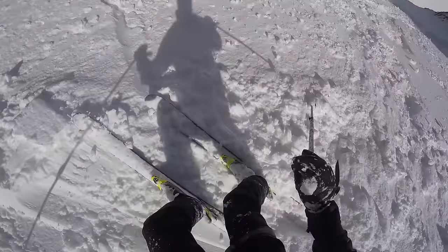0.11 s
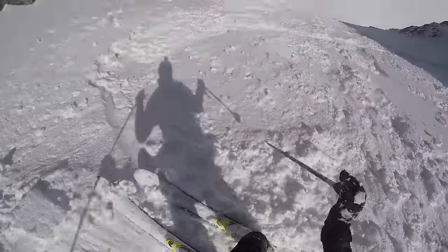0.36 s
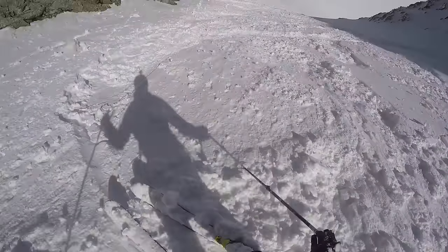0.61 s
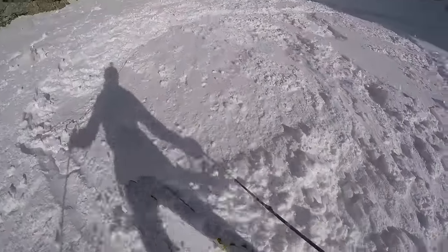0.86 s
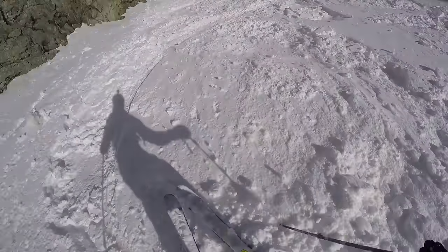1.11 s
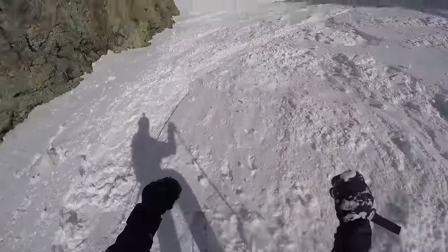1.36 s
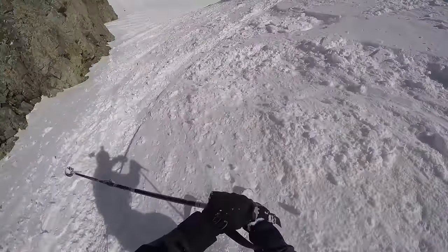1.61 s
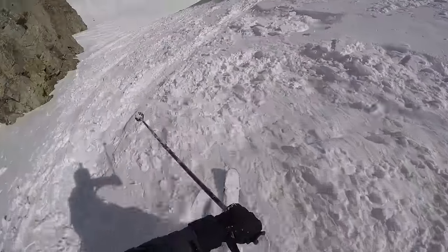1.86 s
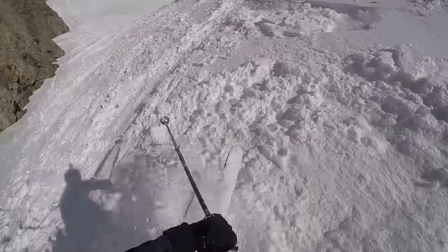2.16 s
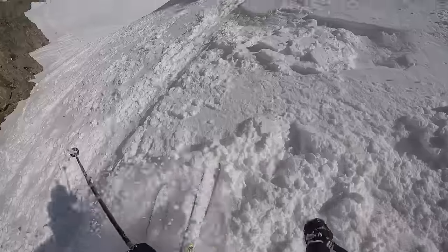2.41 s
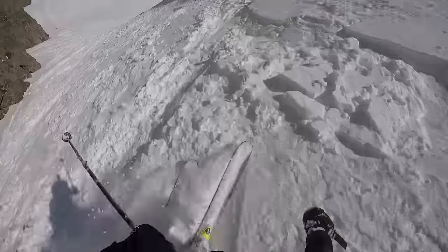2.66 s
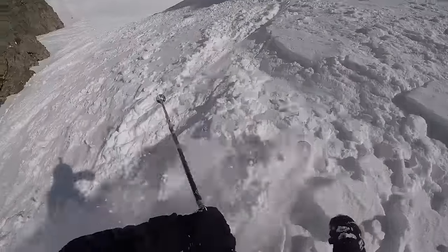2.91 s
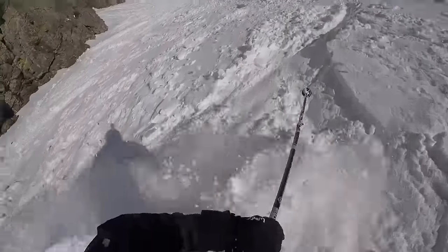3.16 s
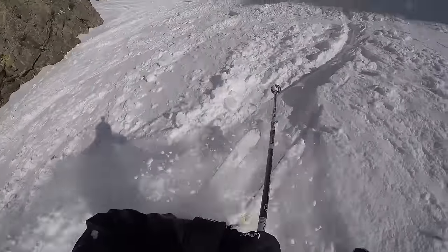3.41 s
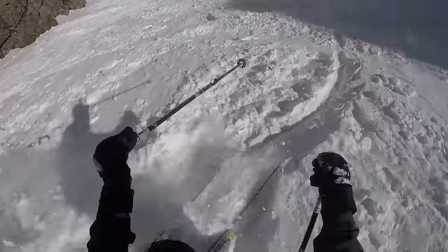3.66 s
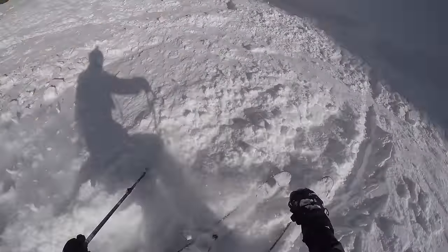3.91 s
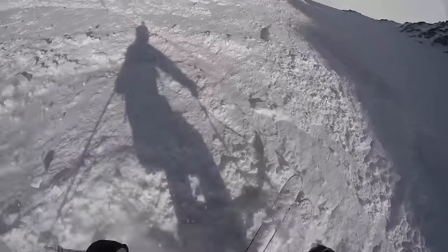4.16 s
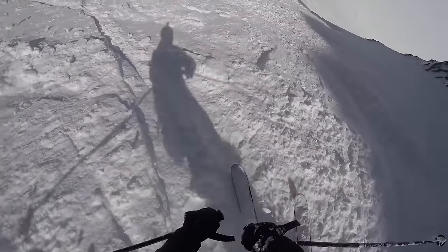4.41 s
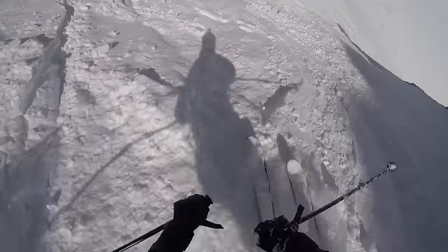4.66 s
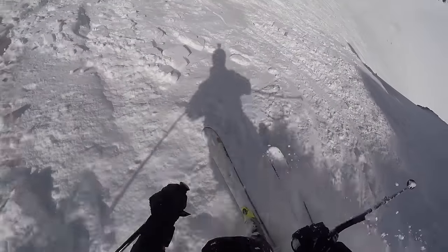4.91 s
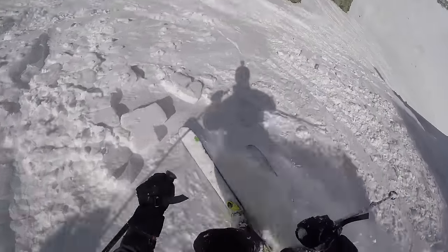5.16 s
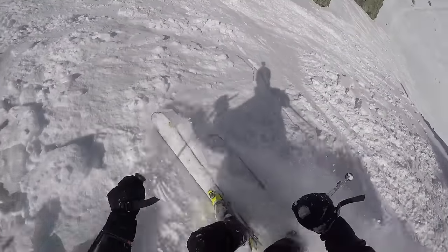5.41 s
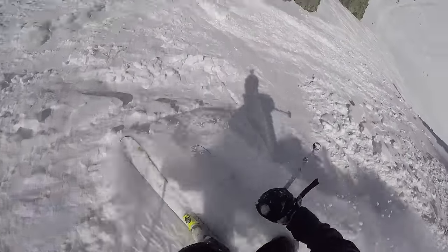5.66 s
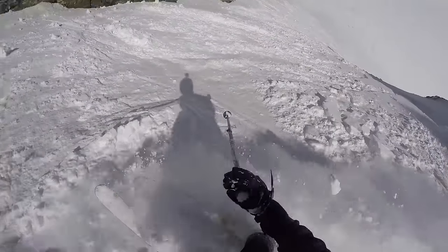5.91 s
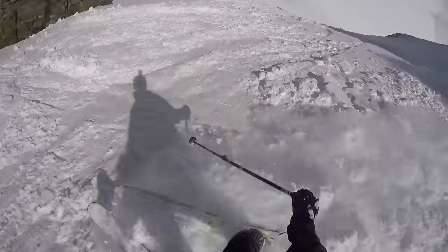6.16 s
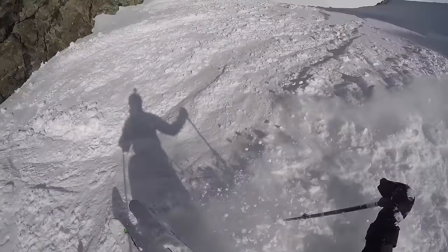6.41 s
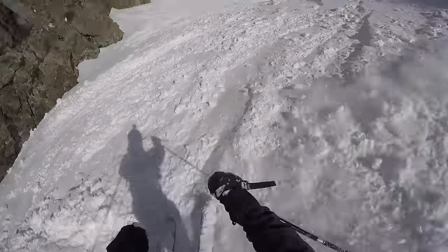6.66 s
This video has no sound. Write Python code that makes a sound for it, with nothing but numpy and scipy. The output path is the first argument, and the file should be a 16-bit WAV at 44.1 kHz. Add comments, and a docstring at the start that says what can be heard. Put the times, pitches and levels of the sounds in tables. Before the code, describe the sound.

Muffled plasticky knocks and gritty edge scrapes from a steep ski descent, building to one very loud crack and bursts of hissing snow.

```python
"""Skiing hard snow, heard inside a helmet camera case

A skier turns down hard, chopped snow; the microphone sits in a closed camera case on the helmet.
Lumps knock through body and mount: case modes tick, then the mount thumps with falling pitch.
Ski edges scrape in gusts of grit through the case modes and squeak in narrow bands; thrown snow
hisses as coloured clicks and noise. Low noise rumbles as wind over faint electronic hiss and whine."""
import sys
import numpy as np
from scipy import signal
from scipy.fft import rfft, irfft
from scipy.io import wavfile
from scipy.ndimage import uniform_filter1d

SR = 44100
rng = np.random.default_rng(int(sys.argv[2]) if len(sys.argv) > 2 else 0)


def store_pcm(level_fs):
    """Save levels as 16-bit WAV."""
    pcm = np.round(np.clip(level_fs, -1, 1) * 32767).astype(np.int16)
    wavfile.write(sys.argv[1], SR, np.atleast_2d(pcm).T)


def invert_db(level):
    """Linear amplitude ratio for a level in decibels (20 dB per decade), elementwise."""
    return 10 ** (np.asarray(level, dtype=float) / 20)


N = 299156
T = np.arange(N) / SR

# case modes: f/Hz, relative level/dB, reference t60/s (each source scales it)
CASE = [(611, -4, 0.02), (1116, 6, 0.012), (1360, -2.5, 0.014), (1642, 0, 0.018), (1880, 4, 0.015),
        (2307, -2, 0.023), (2590, -6, 0.027), (2938, -5, 0.021), (3400, -19.5, 0.01), (3755, -14.5, 0.0089),
        (4450, -14, 0.0057), (5500, -16, 0.0063), (6577, -20, 0.01), (9930, -40, 0.01), (13700, -48, .006)]


def unit(x):
    """Scale to rms 1."""
    return x / np.sqrt(np.mean(x ** 2))


def colour(x, points):
    """Shape x by a (f/Hz, relative density/dB) spectrum, scaled to rms 1."""
    hz, db = np.transpose(points)
    f = np.fft.rfftfreq(N, 1 / SR) + 1
    gain_db = np.interp(np.log(f), np.log(hz), db, left=-70, right=-70)
    return unit(irfft(rfft(x) * invert_db(gain_db), N))


def walk(rate_hz):
    """Random levels held 1 / rate_hz and slewed twice, rms 1."""
    hold = int(SR / rate_hz)
    steps = np.repeat(rng.standard_normal(N // hold + 1), hold)
    slewed = uniform_filter1d(uniform_filter1d(steps, hold), hold)
    return unit(slewed[:N])


def grit(per_s, spread_db, bed):
    """Snow crystals breaking: random clicks of very uneven size over a bed of noise."""
    hit = rng.random(N) < per_s / SR
    size_db = spread_db * rng.exponential(size=N).clip(0, 4)
    clicks = hit * rng.standard_normal(N) * invert_db(size_db)
    return unit(clicks) + bed * rng.standard_normal(N)


def ring(x, hz, t60_s):
    """One damped resonance driven by x (complex one-pole)."""
    pole = np.exp(2j * np.pi * hz / SR - np.log(1000) / (t60_s * SR))
    return signal.lfilter([1], [1, -pole], x).imag


def add(out, start_s, sound):
    """Mix a short sound in at start_s."""
    i = int(start_s * SR)
    out[i:i + len(sound)] += sound[:N - i]


def swell(start_s, top_s, end_s, db, edge_db, fade_s):
    """Power of one event: rises to db at top_s, sinks again, fades out at both ends."""
    nearness = np.interp(T, [start_s, top_s, end_s], [1, 0, 1])
    slope_db = edge_db * nearness ** 1.12  # exponent over 1 flattens the top
    on = uniform_filter1d(1. * ((T >= start_s) & (T < end_s)), int(fade_s * SR))
    return (on * invert_db(db + slope_db)) ** 2


def thump(hz, start_hz, glide_s, t60_s, rise_s):
    """Bending waves in the mount: the high part comes first, the pitch sinks to hz; peak 1."""
    t = T[:SR // 6]
    turns = hz * t + (start_hz - hz) * glide_s * (1 - np.exp(-t / glide_s))
    envelope = (1 - np.exp(-t / rise_s)) ** 2 * invert_db(-60 * t / t60_s)
    wave = np.sin(2 * np.pi * turns) * envelope
    return wave / np.abs(wave).max()


def knocks():
    """Each blow rings the case modes near its own centre, then the mount."""
    # blows: t/s, tick/dB, thump re tick/dB, treble re tick/dB, tick centre f/Hz
    blows = [(0.1839, -36.5, 1, -27, 706), (0.419, -44, -8, -23, 1220), (0.46, -28, -41, -9.5, 1260),
             (0.474, -36.5, -1, -26, 960), (0.5954, -29.5, -3, -34, 850), (0.6626, -32, -1, -19, 1470),
             (0.8421, -31, -39, -29, 1800), (0.8911, -30.5, -44, -38, 1580), (1.2235, -22, -27, -17, 2200),
             (1.4396, -49, 6.5, -10, 1560), (1.562, -39, -30, 2.5, 2800), (1.6565, -51, 14, -15, 1480),
             (1.8605, -16.5, -11, -27, 1480), (1.896, -36, -20, -18, 1600), (1.9219, -29.5, -30, -26, 1700),
             (1.949, -31.5, -25, -30, 1730), (2.0315, -18, -14, -22, 1480), (2.162, -14, -43, -25, 1460),
             (2.1663, -18.5, 2, -39, 1420), (2.3487, -12, -13, -28, 1390), (2.4852, -28.5, -4, -28, 910),
             (2.6982, -21, -6, -45, 1040), (2.7368, -29.5, -6, -10, 1010), (2.79, -24, -6, -25, 870),
             (2.9797, -29.5, -1, -31, 1070), (3.0201, -25.5, -4, -41, 1090), (3.1964, -17, -8.5, -17, 1090),
             (3.2928, -45, -8, -25, 700), (3.4682, -37.5, 3, -26, 880), (3.5428, -50.5, 12.5, -14, 1400),
             (3.7036, -30, -13, -33, 1370), (3.7647, -34.5, -22, -25, 1770), (3.798, -36.5, 6.5, -31, 710),
             (3.8713, -24, -3.5, -43, 960), (3.9754, -20.5, -5.5, -20, 1210), (4.0369, -25, -28, -14, 2450),
             (4.0888, -31, -45, -18, 2240), (4.3181, -29.5, -1.5, -23, 900), (4.5217, -35.5, -3, -30, 895),
             (4.536, -41, -30, -14, 1900), (4.61, -34, -10, -11, 990), (4.6505, -20.5, 2, -39, 1132),
             (4.6967, -23.5, 0, -34, 980), (4.7171, -32.5, 3, 1.5, 1840), (4.7239, -15.5, 0.5, -25, 1100),
             (4.8535, -17, -13, -45, 1370), (5.0305, -44.5, 11, -20, 660), (5.065, -48, 12, -20, 800),
             (5.081, -43, -30, -20, 1470), (5.2181, -18.5, -19.5, -33, 1720), (5.2383, -25, -12, -20, 1230),
             (5.2838, -16, -7, -31, 1200), (5.2901, -10.5, 0.5, -38, 1230), (5.3125, 2, -25.5, -8, 2280),
             (5.354, -20.5, -12, -16, 1000), (5.4123, -21.5, 1, -21, 1180), (5.5, -34, -12, -30, 1000),
             (5.5124, -21.5, 2.5, -24, 1170), (5.537, -33, -30, -25, 1300), (5.5789, -31, -3, -22.5, 1570),
             (5.6158, -35.5, 8, -17, 2140), (5.66, -39, -25, -25, 1200), (5.7084, -28, -7, -20, 1101),
             (6.316, -28.5, -43, -14, 1695), (6.419, -32, -5.5, -31, 1360), (6.5194, -34, -29, -28, 1840),
             (6.6219, -36, -34, -13, 1730), (6.6943, -34.5, 5, -26, 949.8),
             (6.7203, -15.5, -4.5, -19, 983.2)]
    # blows that tip the mount downwards first, a drier swing: t/s
    tip_down_s = np.array([0.1834, 0.5954, 0.6625, 1.8604, 2.3489, 2.6982, 2.9797, 3.0206, 3.1966, 3.7034,
                           3.798, 3.8714, 3.9759])
    light_tick_db = 1.4  # lowest mode, per dB of thump below -20 dB
    bright_tilt = 0.27  # dB per octave of top, per dB of treble
    snap_db, snap_per_treble, snap_t60_s = -15.5, 1.9, 0.0044  # wide-band crack of the contact

    out, t, snap_t = np.zeros(N), T[:SR // 20, None], T[:SR // 100]
    hz, mode_db, t60_s = np.transpose(CASE)
    chance = rng.standard_normal((len(blows), 2, len(CASE)))
    shell = 0.47 * thump(208.5, 378.0, 0.0017, 0.075, 0.00043)
    early = thump(584.0, 649.0, 0.0033, 0.025, 0.0004)  # helmet shell, ahead of the mount
    nod_up = thump(72.5, 125.6, 0.0075, 0.034, 0.0021) + shell
    nod_down = -thump(70.0, 271.0, 0.0048, 0.023, 0.0056) - 0.78 * shell

    for (s, tick_db, thump_db, treble_db, centre_hz), (gain, phase) in zip(blows, chance):
        near_db = mode_db - 6 * np.log2(hz / centre_hz) ** 2 + 2 * gain
        near_db += (hz < 800) * light_tick_db * min(thump_db + 20, 0)
        tilt_db = bright_tilt * (treble_db + 20) * np.log2(hz / 3650)  # hard contacts reach higher
        top_db = mode_db + 3 * gain + tilt_db

        # a quick first fall, then a weak tail
        decay = invert_db(-60 * t / (0.19 * t60_s)) + 0.035 * invert_db(-60 * t / (1.255 * t60_s))
        start_rad = 1 + 0.6 * phase
        modes = decay * np.sin(2 * np.pi * hz * t + start_rad)
        modes *= (1 - np.exp(-t / 0.00049)) ** 3  # the contact takes a moment to build
        body = modes @ (invert_db(near_db) * (hz < 3300))
        top = modes @ (invert_db(top_db) * (hz > 3300))
        body = signal.lfilter(*signal.butter(2, 0.31 * centre_hz, "high", fs=SR), body)
        tick = body / np.abs(body).max() + invert_db(treble_db) * top / np.abs(top).max()

        snap = np.diff(rng.standard_normal(SR // 100 + 1)) * invert_db(-60 * snap_t / snap_t60_s)
        tips_down = np.abs(s - tip_down_s).min() < 0.004
        add(out, s, invert_db(tick_db - 5 + min(thump_db, -4)) * early)
        add(out, s, invert_db(tick_db + snap_db + snap_per_treble * treble_db) * snap)
        add(out, s, invert_db(tick_db) * tick)
        add(out, s + 0.002, invert_db(tick_db + thump_db) * (nod_down if tips_down else nod_up))
    return out


def jolts():
    """Soft blows that only shake the mount: no tick, a slow swing."""
    # t/s, peak level/dB, final f/Hz
    shakes = [(1.5, -41, 80), (2.735, -23, 75.5), (4.441, -46.5, 88), (4.635, -23, 68), (5.151, -43, 110),
              (5.255, -25.5, 63.33), (5.457, -39, 40.9), (5.868, -38.5, 59.7), (5.95, -36.5, 70),
              (6.58, -45, 103), (6.663, -31, 44), (6.728, -17, 61.01)]
    out = np.zeros(N)
    for s, db, hz in shakes:
        add(out, s, invert_db(db) * thump(hz, 294.0, 0.002, 0.1, 0.003))
    return out


def scrape():
    """Steel edges grind over crust; coarse grit rings the low case modes, fine grit the high ones."""
    # edge strokes: start/s, hardest/s, end/s, relative scrape level/dB, coarse grit re scrape/dB
    strokes = [(0, .05, 0.68, -70.5, -1), (0.455, .63, 0.9, -49.5, -5), (0.913, 1.014, 1.144, -45.5, -6),
               (0.99, 1.157, 1.271, -44, -7.5), (1.242, 1.3, 3.1, -58.5, -7.5),
               (1.724, 1.8, 1.86, -50, -5.5), (1.881, 1.99, 2.08, -49.5, -5), (2.104, 2.2, 2.26, -57, -4.5),
               (2.377, 2.7, 2.76, -54.5, -12.5), (2.785, 2.9, 3.19, -49, -6),
               (3.06, 3.21, 3.39, -47.5, -6.5), (3.63, 3.707, 3.9, -52, -4), (3.923, 3.98, 4.07, -52, -0.5),
               (4.11, 4.13, 4.35, -50.5, -7.5), (4.244, 4.28, 4.46, -52.5, -6),
               (4.55, 4.72, 4.81, -53, -2.5), (4.805, 4.86, 5.0, -60.5, -18), (5.277, 5.32, 5.43, -48, -8),
               (5.418, 5.48, 5.42, -43, -6), (5.513, 5.54, 5.66, -44.5, -5),
               (5.67, 5.85, 6.12, -45.5, -1.2), (5.864, 5.94, 6.03, -42, -7.5),
               (6.023, 6.04, 6.21, -45, -3), (6.384, 6.46, 6.55, -48, -4), (6.57, 6.75, 6.79, -53, -4)]
    edge_db, fade_s = -8, 0.039  # start and end re hardest moment
    glide_db, glide_coarse_db = -67, -0.6  # relative: flat skis between strokes; their coarse grit
    fine_per_coarse = -0.31  # dB of fine grit per dB of coarse grit

    power = [swell(*row[:4], edge_db, fade_s) for row in strokes]
    medium = np.sqrt(sum(power) + invert_db(2 * glide_db))
    coarse_power = sum(p * invert_db(2 * row[4]) for p, row in zip(power, strokes))
    coarse = np.sqrt(coarse_power + invert_db(2 * (glide_db + glide_coarse_db)))
    fine = medium * (coarse / medium) ** fine_per_coarse

    out, judder = 0, walk(27.92)
    for hz, mode_db, t60_s in CASE:
        share = coarse if hz < 1450 else fine if hz > 2100 else medium
        flicker_db = 2.0 * judder + 0.72 * walk(22)
        # edge and case both select the band, so its flanks are steep
        edge = ring(grit(700, 2.5, 0.96), hz, 0.59 * t60_s)
        band = ring(edge, hz, 0.36 * t60_s)
        band_db = mode_db - 1.8 * (hz > 3300) - 7.1 * (hz < 800) + flicker_db
        out = out + invert_db(band_db) * share * unit(band)
    return out * invert_db(-7.0)


def squeaks():
    """Stick-slip that locks to one pitch: grit in a narrow band, swelling and fading."""
    # held notes: start/s, end/s, f/Hz, nominal width/Hz, rms before the fades/dB
    notes = [(0, 0.28, 1750, 141, -59), (0.915, 1.027, 1134, 90, -49.5), (1.27, 1.427, 1750, 150, -70),
             (1.59, 1.65, 1020, 81, -55.5), (1.731, 1.797, 1790, 120, -53), (3.399, 3.52, 1570, 150, -62.5),
             (3.953, 4.056, 1120, 45, -50.5), (6.078, 6.288, 1156, 79.5, -54)]
    out = np.zeros(N)
    for start_s, end_s, hz, width_hz, db in notes:
        grains = grit(900, 0.73, 1.0)[:int((end_s - start_s) * SR)]
        band = ring(ring(grains, hz, 1.8 / width_hz), hz, 2.2 / width_hz)
        add(out, start_s, invert_db(db) * unit(band) * signal.windows.tukey(len(band), 0.4))
    return out


def thrown_snow():
    """Fine snow sprays in short bright bursts; it comes through the case and takes on its ring."""
    # spray spectrum: f/Hz, relative density/dB
    snow = [(710, -21), (1200, -29.5), (1380, -35), (1600, -22), (2400, -6.5), (3250, -11.5), (3940, -3),
            (5040, -12.5), (6600, -14.5), (9780, -27), (15500, -42)]
    # bursts: start/s, thickest/s, end/s, level before flicker/dB
    bursts = [(4.562, 4.609, 4.8, -56), (4.7, 4.726, 5.03, -60), (5.214, 5.222, 5.31, -39.5),
              (5.283, 5.33, 5.36, -44), (5.428, 5.465, 5.488, -41.5), (5.504, 5.583, 5.62, -44.5),
              (5.604, 5.64, 5.665, -47.5), (5.905, 5.947, 5.957, -39.5), (6.033, 6.039, 6.12, -50.5),
              (6.137, 6.17, 6.44, -59), (6.737, 6.746, 6.78, -53)]
    edge_db, fade_s = -10.5, 0.011  # start and end re thickest moment
    drift_db = -69  # thin snow dust between bursts
    power = sum(swell(*row, edge_db, fade_s) for row in bursts)
    gain = np.sqrt(power + invert_db(2 * drift_db))
    spray = colour(grit(1200, 2.7, 1.0), snow)
    case = sum(unit(ring(spray, hz, 0.5 * t60_s)) * invert_db(0.27 * db)
               for hz, db, t60_s in CASE if hz > 1300)
    flicker_db = 2.1 * walk(70)
    return unit(spray + 1.05 * unit(case)) * gain * invert_db(flicker_db)


def wind():
    """Gusty low buffeting on the shell: coloured noise with a wandering level."""
    # rumble spectrum: f/Hz, relative density/dB
    rumble = [(8.8, -29), (15, 9), (54, -7), (86, -2), (101, -39), (114, -10.5), (304, -43), (500, -27),
              (650, -30), (1100, -120)]
    # gusts: t/s, level before flutter/dB
    gusts = [(0.0, -57), (0.51, -58.5), (0.6, -54), (1.47, -52.5), (1.75, -50), (2.57, -54.5), (2.91, -50),
             (3.55, -55), (3.85, -48.5), (4.25, -52.5), (4.74, -46.5), (5.23, -48), (5.44, -34), (5.7, -49),
             (6.44, -54.5), (6.78, -45)]
    level_db = np.interp(T, *np.transpose(gusts)) + 1.8 * walk(29)
    return colour(rng.standard_normal(N), rumble) * invert_db(level_db)


def electronics():
    """Steady circuit noise: coloured hiss and a thin sine whine."""
    # hiss spectrum: f/Hz, relative density/dB
    hiss_points = [(120, -2), (200, 18.5), (448, -5), (1100, -35), (1370, -8), (1810, -8.5), (2960, 7),
                   (3310, -0.5), (13300, -9.5), (15100, -10.5), (16000, -57)]
    # whine: f/Hz, rms level/dB
    tones = [(10406, -86)]
    hiss = colour(rng.standard_normal(N), hiss_points) * invert_db(-65)
    whine = sum(invert_db(db) * np.sqrt(2) * np.sin(2 * np.pi * hz * T) for hz, db in tones)
    return hiss + whine


def scene():
    """All sources as they reach the capsule."""
    return (knocks() + jolts() + scrape() + squeaks() + thrown_snow() + wind())[None]


def top_cut(x):
    """Nothing passes above the cut-off."""
    return signal.sosfilt(signal.butter(12, 16320, fs=SR, output="sos"), x)


def record(dry):
    """The input softly rounds the hardest blows; the electronics add hiss and whine."""
    rounded = np.tanh(dry / 1.05) * 1.05
    return top_cut(rounded + electronics())


dry = scene()
out = record(dry)
store_pcm(out)
```